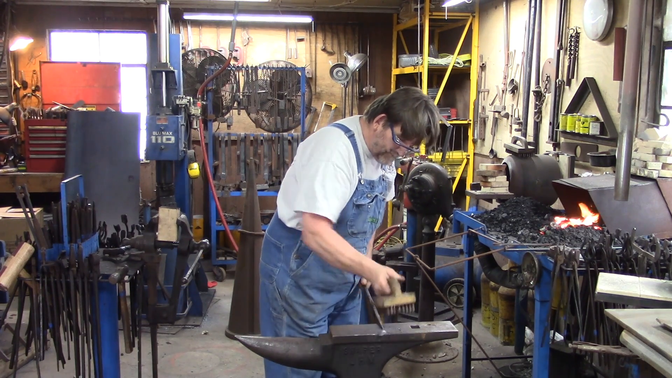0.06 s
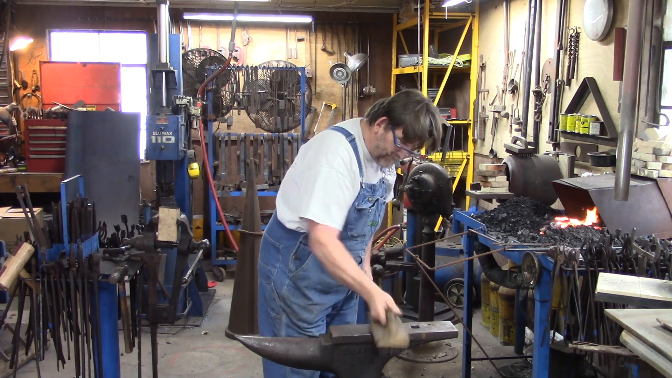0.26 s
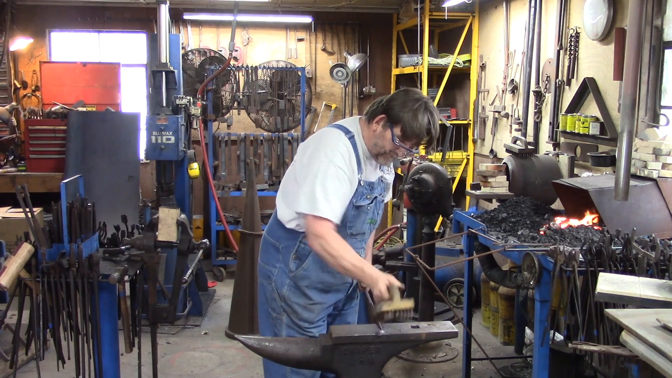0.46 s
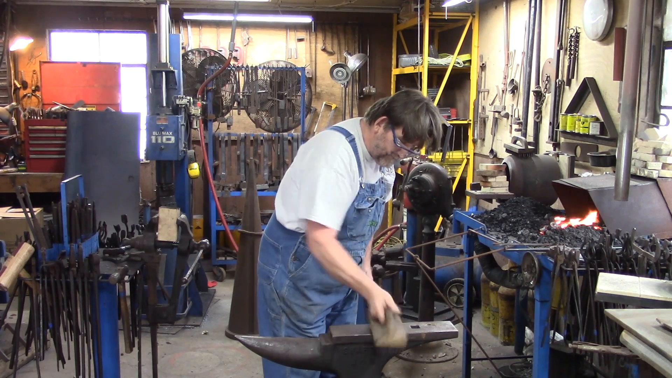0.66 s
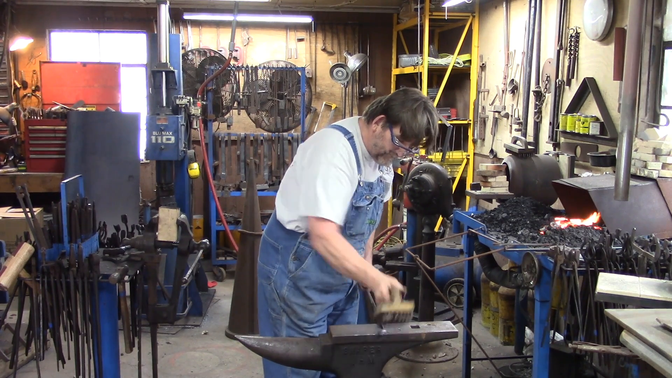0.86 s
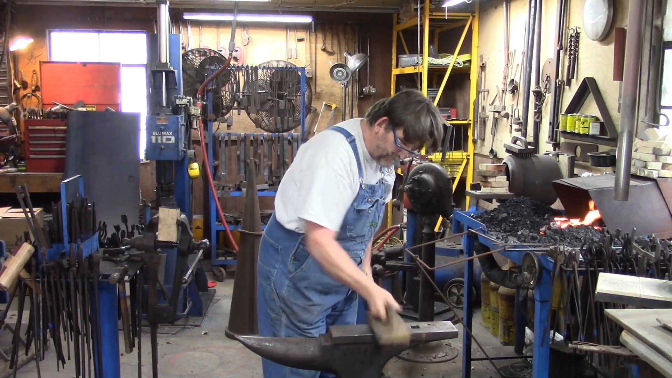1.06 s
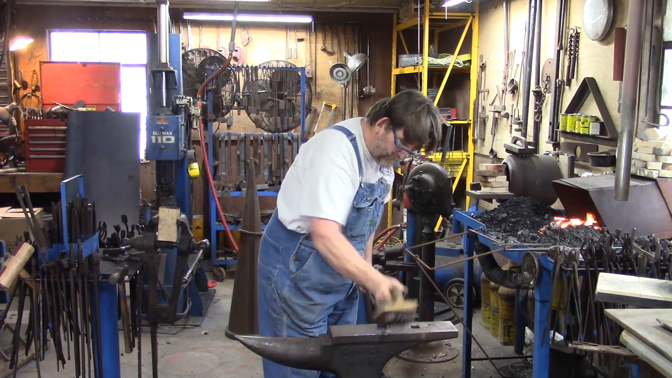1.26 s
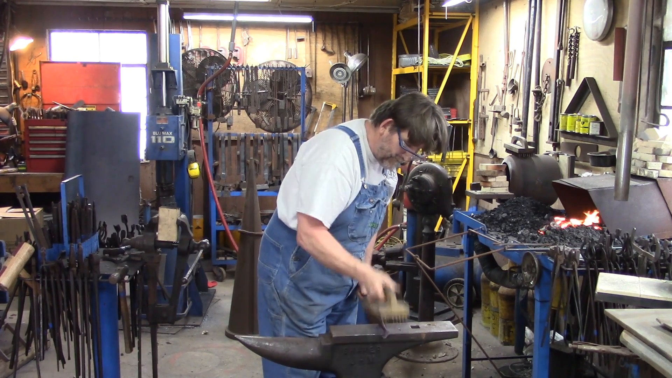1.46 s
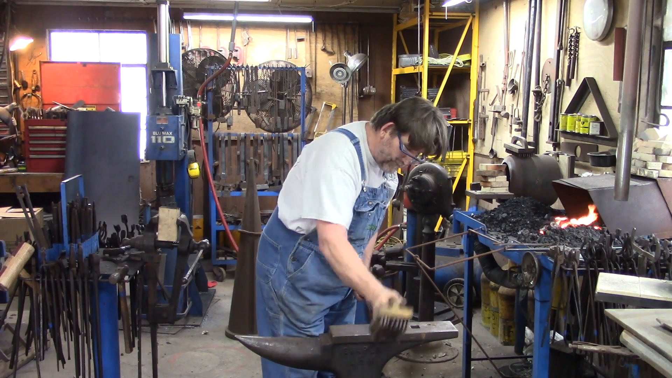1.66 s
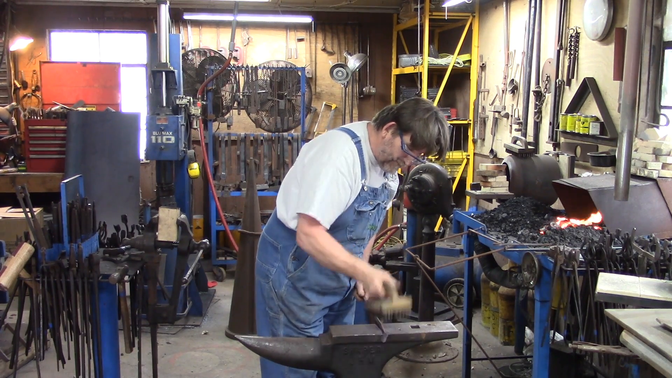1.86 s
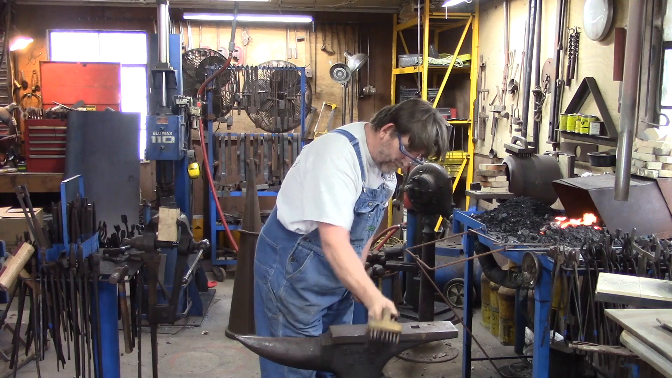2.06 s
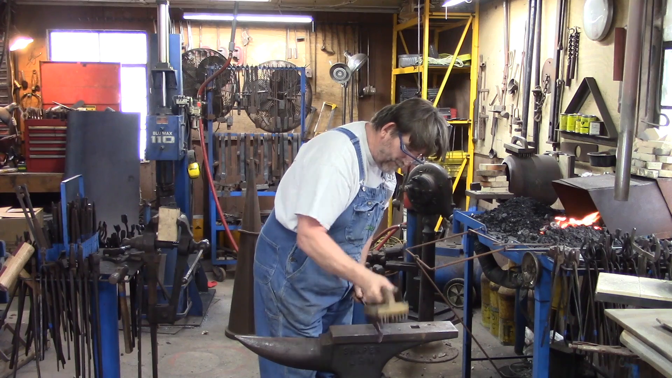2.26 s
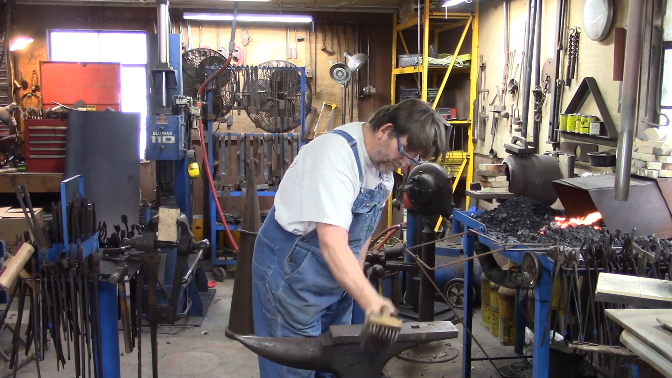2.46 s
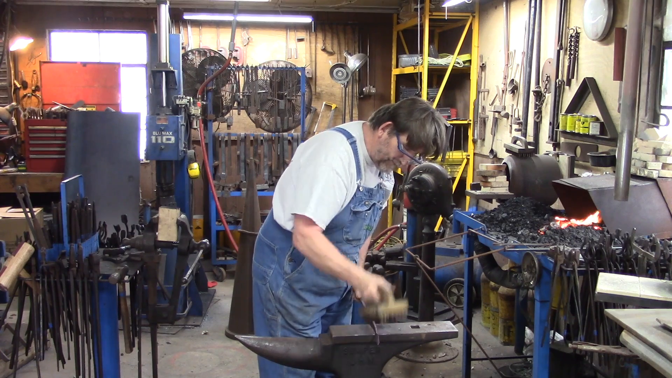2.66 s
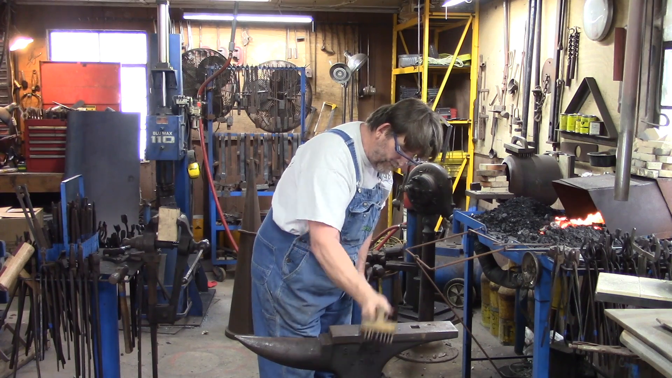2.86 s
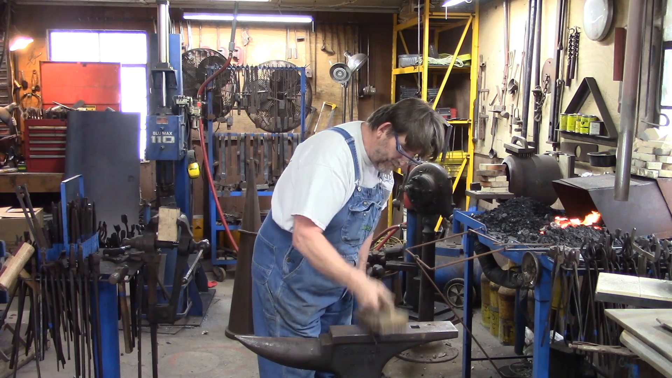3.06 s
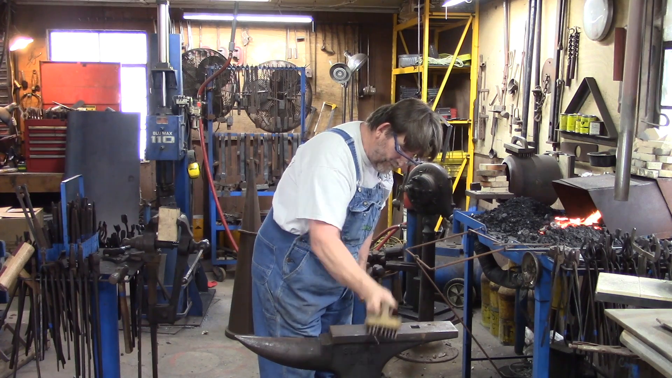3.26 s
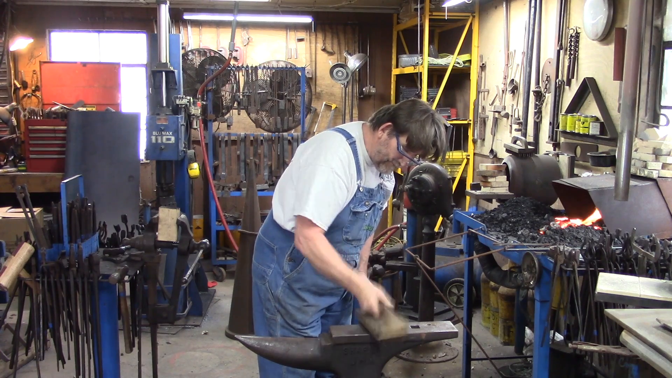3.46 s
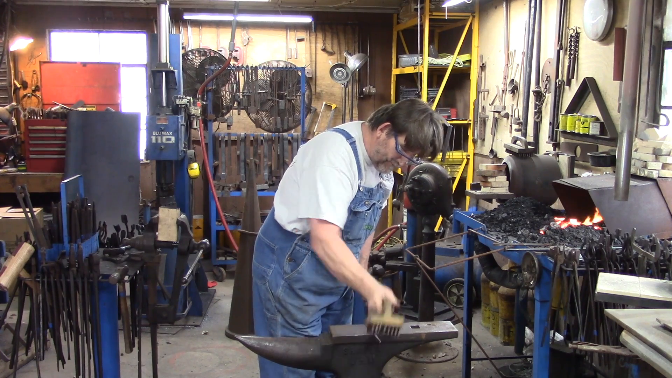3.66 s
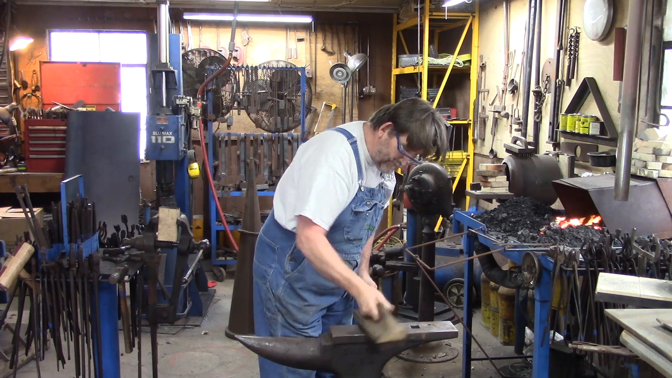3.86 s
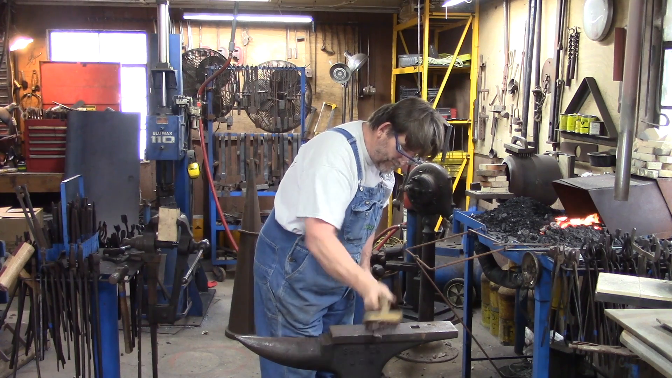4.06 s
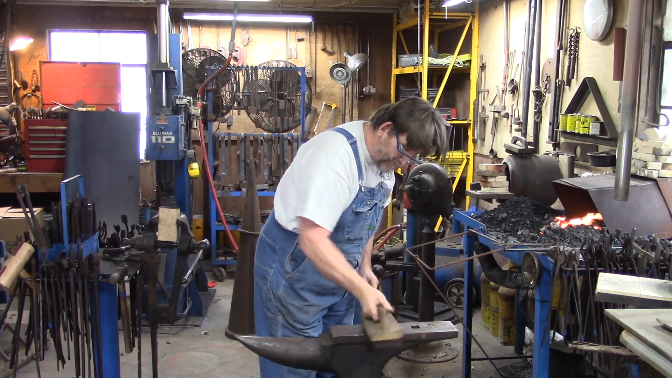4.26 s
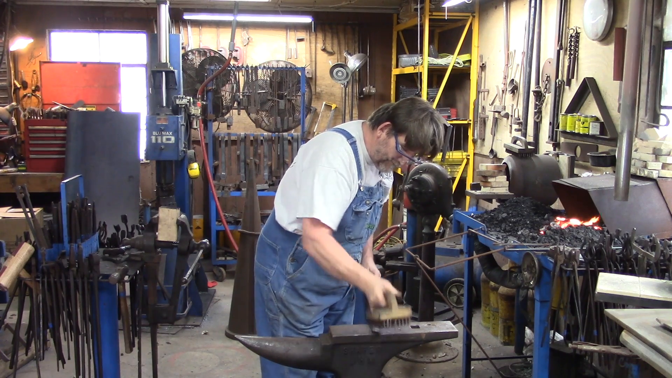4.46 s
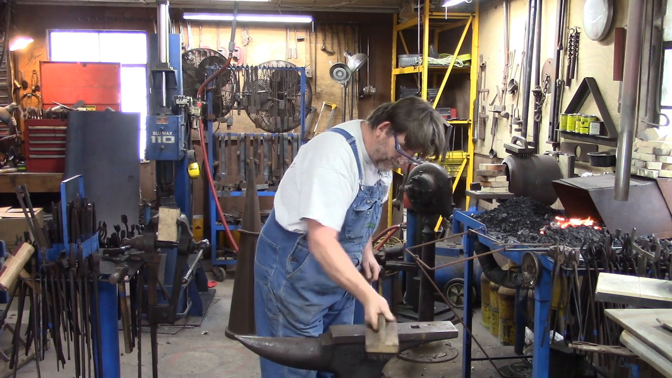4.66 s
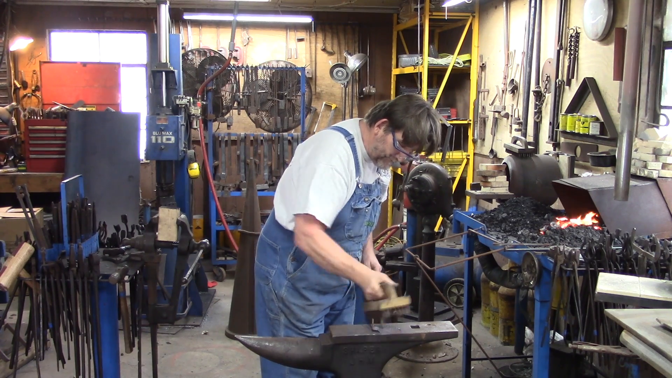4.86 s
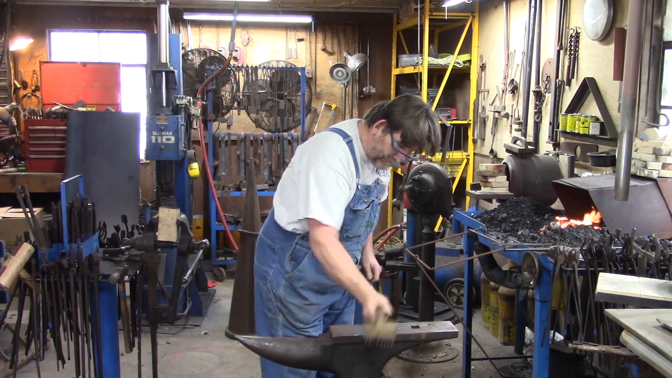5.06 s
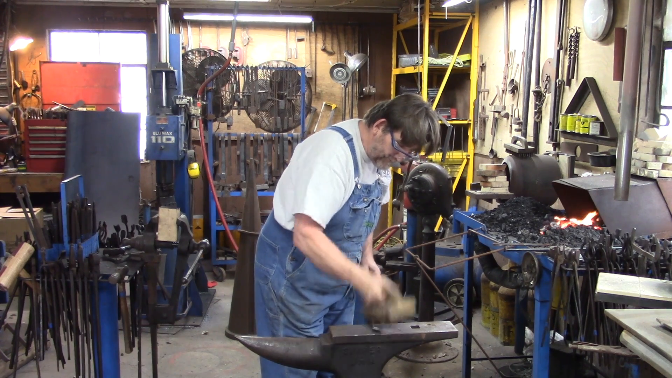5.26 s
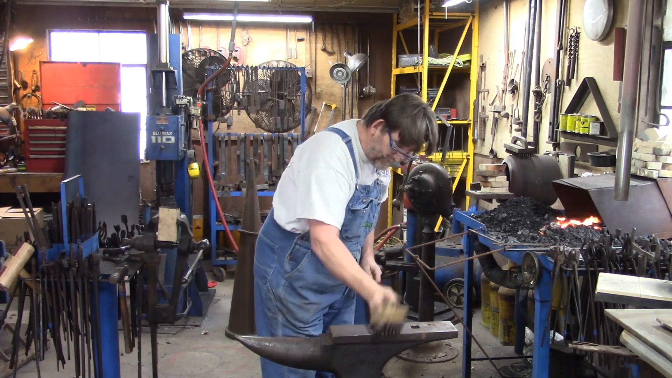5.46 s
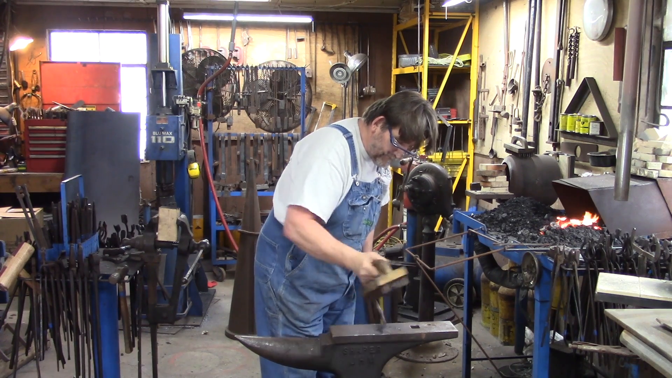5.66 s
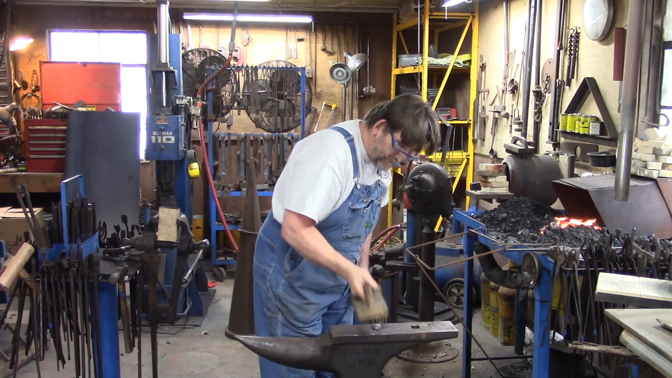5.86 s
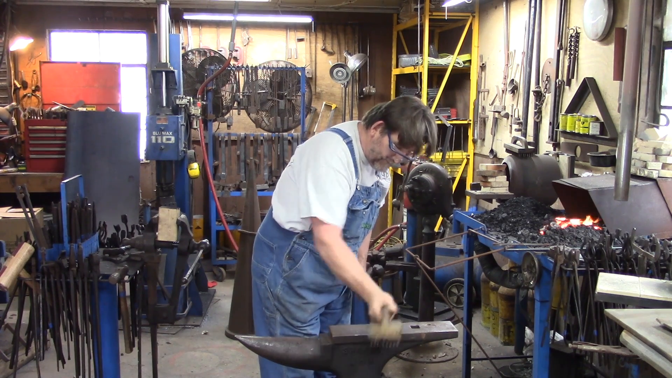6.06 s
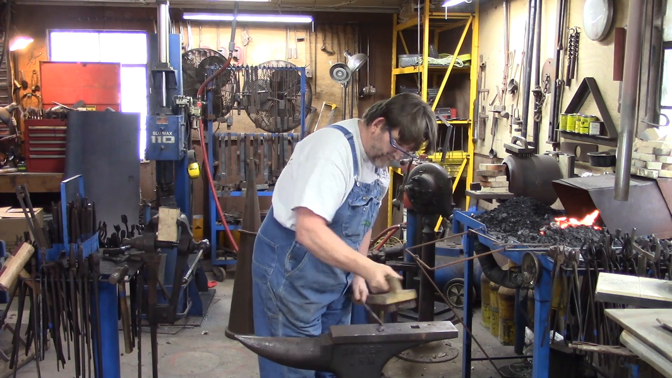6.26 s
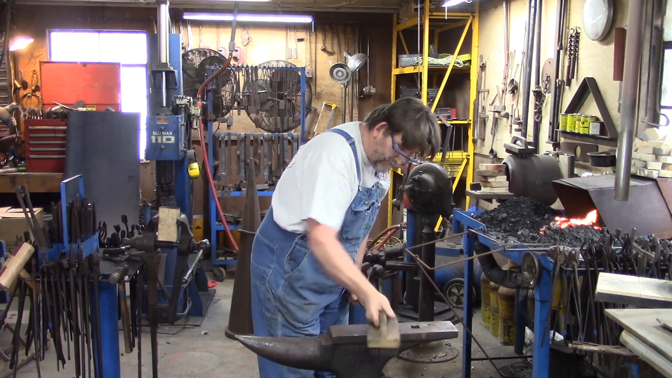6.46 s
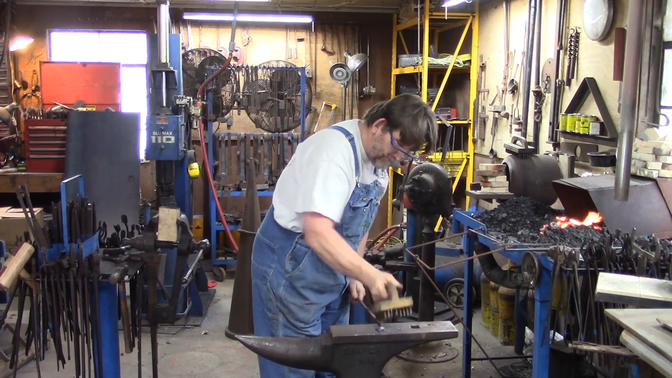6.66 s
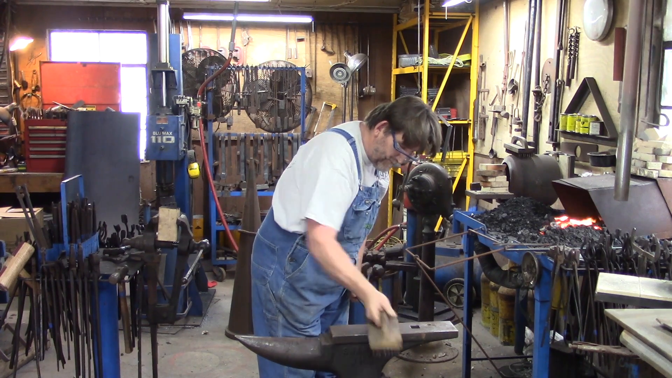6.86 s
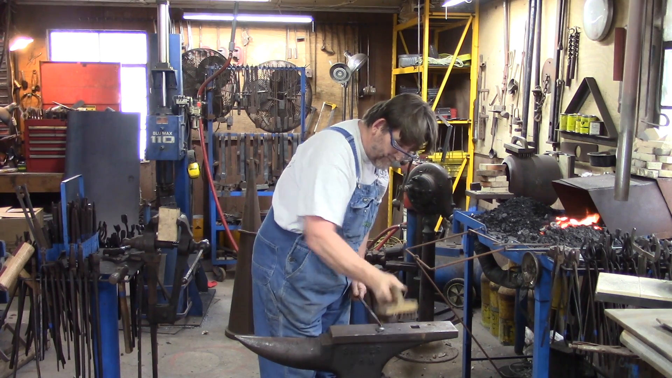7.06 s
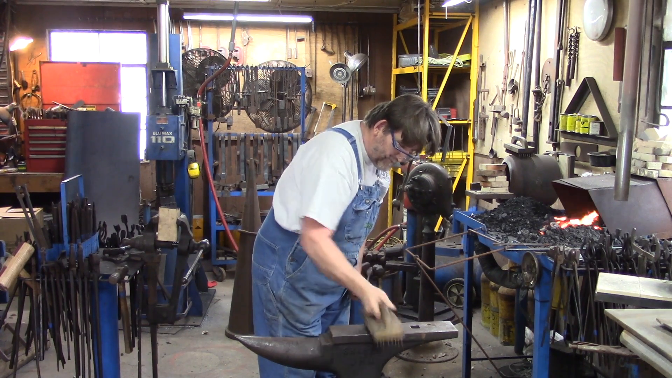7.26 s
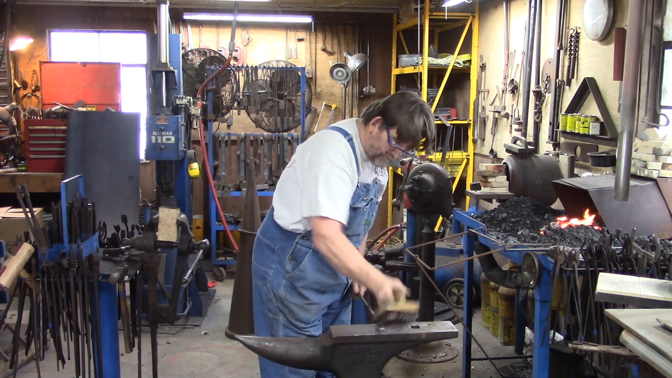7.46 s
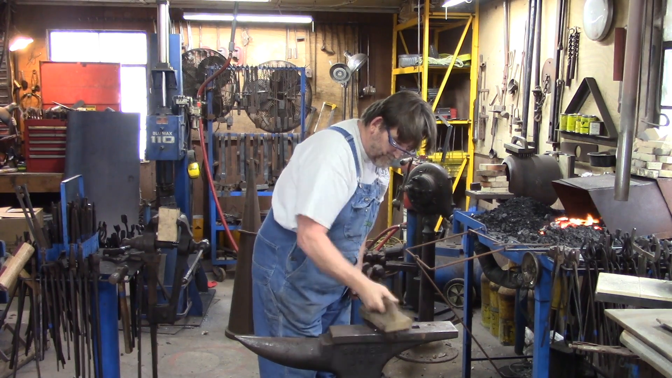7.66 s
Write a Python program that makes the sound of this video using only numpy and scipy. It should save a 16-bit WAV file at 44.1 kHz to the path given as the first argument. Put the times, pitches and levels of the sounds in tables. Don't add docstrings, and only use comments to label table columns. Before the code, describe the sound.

A quiet, distant forge blower hums with airy noise and a slight pipe whistle throughout. At 0 s the last of a brush stroke is dying away. From 0.2 s a wire brush scrubs a steel bar on an anvil, one short stroke about every 0.4 s. Each lands with a small knock, rasps for roughly a tenth of a second with gritty midrange and fizzing bristle hiss, then lifts off into a high steel ring and a half-second workshop tail. Strokes vary in bite and brightness. Around 3.84 s a loose tool clinks lightly. At 4.4 s the sound drops out completely for a blink. After the stroke at 5.3 s comes a longer gap, with a faint jingle of free bristles near 5.7 s. Scrubbing resumes at 5.97 s, with firm strokes around 6.4, 6.8, 7.25 and 7.7 s. The microphone is close and the image narrow.

```python
import sys
import numpy as np
from scipy import signal
from scipy.fft import rfft, irfft, next_fast_len
from scipy.io import wavfile

SR = 44100
rng = np.random.default_rng(int(sys.argv[2]) if len(sys.argv) > 2 else 0)


def wav_record(signal):
    frames = np.transpose(np.atleast_2d(signal))
    bounded = np.clip(frames, -1, 1)
    quanta = np.round(bounded * 32767).astype(np.int16)
    wavfile.write(sys.argv[1], SR, quanta)


def volts(x):
    e = np.asarray(x, float) / 20
    return 10 ** e


N = 340452
LEAD = SR // 4
SIZE = next_fast_len(N + LEAD + SR)

# [freq_hz, level_db]
SCRAPE_COLOUR = [(290, -33.5), (500, -12.5), (584, -11.5), (1120, -6), (1210, -10.5), (1840, -1),
                 (3000, -8), (3500, -8.5), (4550, -16), (7700, -120)]
# [freq_hz, level_db]
FIZZ_COLOUR = [(2470, -54), (4200, 2), (4840, 0), (5330, 0.5), (8930, -5), (11900, -12.5), (14300, -15),
               (15300, -17.5), (16300, -33)]
# [freq_hz, level_db]
WOOD_COLOUR = [(18, -77), (30, -41), (136, -25.5), (348, 2), (404, -0.5), (426, -12), (508, 3), (581, -8),
               (750, -9.5), (980, -56), (1650, -120)]
# [pitch_hz, width_hz, level_db]
BAR_MODES = [(993, 55, -9.5), (1093, 44, -7), (1260, 79, -2.5), (1441, 13, -4.5), (1564, 20, -5),
             (1690, 32, -4.5), (1794, 78, 3), (1890, 130, 3.5), (2262, 97, -7.5), (2430, 620, -2.5)]
# [pitch_hz, width_hz, level_db]
RING_MODES = [(3690, 110, -5), (3785, 90, 0), (3870, 110, -1.5), (4050, 110, -9), (4450, 160, -11)]


def brush():
    scrape, ring, fizz, wood, deep, main, upper, sheen = stroke_gains()
    coarse = slips(per_s=7000, spread_db=2.0, clump_db=-0.13, clump_rate=380)
    fine = slips(per_s=14000, spread_db=1.5, clump_db=1.5, clump_rate=210)

    body = volts(-4.0) * colour(scrape * coarse, SCRAPE_COLOUR)
    body += volts(-14.5) * wandering(scrape * fine * deep, BAR_MODES[:5], wander_db=3.5, rate=2.4)
    body += volts(-11.0) * wandering(scrape * fine * upper, BAR_MODES[8:], wander_db=-5.0, rate=33)

    steel = volts(-0.5) * wandering(ring * coarse, RING_MODES, wander_db=2.5, rate=150)
    steel += volts(-11) * wandering(scrape * fine * main, BAR_MODES[5:8], wander_db=3.5, rate=38)

    bristles = volts(-2.5) * colour(fizz * fine, FIZZ_COLOUR) + volts(-7.5) * pings(fizz)
    treble = signal.sosfilt(signal.butter(1, 8000, "high", fs=SR, output="sos"), bristles)
    tufts = patchy(body + bristles, patch_db=1.4, rate=35)
    back = volts(-3.5 + 1.7 * drift(20)) * colour(wood * fine, WOOD_COLOUR)
    return tufts + (sheen - 1) * treble + back, steel


# [touch_s, time_on_bar_s, scrape_db, bite_at_touch_db, slow_start_of_fizz_db]
STROKES = [(-.2, .12, -19.5, 0, 6), (.213, 0.12, -15.5, 16.5, 10), (0.625, 0.13, -16.5, 9, 2),
           (1.039, 0.12, -17, -1, 13), (1.518, 0.094, -19.5, 2, 14.5), (1.939, 0.097, -21.5, 10.5, 5.5),
           (2.336, 0.096, -20.5, 15, 1), (2.729, 0.079, -16, 11.5, 13), (3.103, 0.1, -18, 7, -1.5),
           (3.483, 0.13, -21.5, 9, -1.5), (3.867, .12, -17, 0, 12), (4.245, .14, -19, 3.5, 4),
           (4.605, 0.12, -16.5, 7.5, 4), (4.975, 0.098, -15.5, 13.5, 0), (5.326, .13, -18, 3, 8),
           (5.971, 0.088, -16, -3.5, 8), (6.417, 0.11, -14, 8, 5), (6.831, 0.13, -18, 16.5, 5),
           (7.249, .14, -16.5, 9.5, 0.5), (7.692, 0.103, -13.5, 4.5, 6)]
# [ring_peak_after_touch_s, ring_swell_db, fizz_re_scrape_db, wood_re_scrape_db]
VOICING = [(0.07, 0, -1.5, -24), (0.051, -6, -0.5, -20.5), (.09, 1, -0.5, -16), (0.08, 0, 1.5, -16),
           (0.086, 11, 3.5, -17.5), (0.024, 5, 0, -14), (0.051, 6.5, 0.5, -12), (0.037, 8, 2, -14.5),
           (0.09, 5, -1.5, -14), (0.1, 12, -2.5, -16), (0.064, 10, -3.5, -17.5), (0.078, 7.5, 0, -13),
           (0.11, 3, 0, -14.5), (0.062, 2, 1.5, -13.5), (0.052, 3, 1.5, -13), (0.098, 10, 1, -14.5),
           (0.059, 6.5, -3, -13.5), (0.044, -3, 0.5, -12), (0.013, 6, -0.5, -13.5), (.07, 6.5, 3.5, -16)]
# [last_bristles_flick_off_db, steady_ring_db, time_to_load_bristles_ms]
GRIP = [(-1, 2.5, 4), (4, -4, 3), (2, -1, 5.9), (5, -1.5, 2.3), (0, 0, 3), (3, -0.5, 2.5), (2.5, 2.5, 2.8),
        (-3.5, -3, 3), (0, 2.5, 4.6), (2, 1.5, 2.7), (1.5, 2, 14), (2, 1, 3.2), (3, 1.5, 4), (2, 3, 5),
        (3, 1.5, 2.2), (1, 2, 11), (2, 0.5, 3), (4, 1, 5), (5, 0, 4.6), (2, 0, 6)]
# [deep_notes_db, main_notes_db, upper_notes_db, top_sheen_db]
BEARING = [(-1, 0, 2, 3), (-1, -10, -11, -1), (-20, -1.5, 3, 2), (-10, -0.5, 3.5, -2), (-3, 2, 1, 2),
           (-15, 3, -6, 2), (-3, 4, 6, -0.5), (0, -2.5, -19, 1.5), (-5.5, 2, 3.5, 2.5), (-7, -1, 1, 3.5),
           (-6, -1, 0.5, 6), (-3, 2.5, 1.5, 1.5), (-8.5, -5, -1, -0.5), (-5, 4, 1.5, -1.5),
           (-15, 4.5, 3, -0.5), (-12, 0.5, 6.5, 2.5), (-9, -1, 0, 4), (-5, 0.5, 6.5, 2), (-21, 0, 3, 1.5),
           (9, -2, 10, 1)]


def stroke_gains():
    t = np.arange(-LEAD, N) / SR
    now = np.maximum(np.searchsorted(np.array(STROKES)[:, 0], t) - 1, 0)
    columns = np.column_stack([STROKES, VOICING, GRIP, BEARING])[now].T
    touch, length, level_db, bite_db, slow_db = columns[:5]
    sing_s, swell_db, fizz_db, wood_db = columns[5:9]
    flick_db, ring_db, load_ms = columns[9:12]
    bearing_db = columns[12:]

    age = t - touch
    off = np.maximum(age - length, 0)
    knee_s = 0.068
    lifted = np.minimum(off / knee_s, 1)
    flick = flick_db * np.exp(-((age - length) / 0.012) ** 2)
    swell = swell_db * np.exp(-((age - sing_s) / 0.016) ** 2)

    load = level_db - 8.5 * np.maximum(1 - 1000 * age / load_ms, 0)
    load += flick + 0.067 * swell
    load -= 260 * off + 146 * np.maximum(off - knee_s, 0)
    bite = bite_db * np.exp(-age / 0.013)
    ring = -4.5 + ring_db + swell + 10 * lifted
    fizz = fizz_db + 0.23 * flick - slow_db * np.exp(-age / 0.033)
    wood = wood_db + 0.69 * bite + 8.5 * lifted
    gains = volts(load + np.array([bite, ring, fizz, wood])) * (age >= 0)
    return *gains, *volts(bearing_db)


def pings(gain):
    snaps = gain * slips(per_s=410, spread_db=-4.0, clump_db=5.5, clump_rate=15)
    dealt = rng.integers(0, 10, N + LEAD)
    out = 0
    for k, hz in enumerate(np.geomspace(4300, 12500, num=10)):
        level_db = -7.0 * np.log2(hz / 4300)
        out = out + volts(level_db) * resonate(snaps * (dealt == k), [(hz, hz * 0.057, level_db)])
    return out


# [start_s, knock_peak_db, knock_pitch_hz, ping_re_knock_db, ping_pitch_hz]
LANDINGS = [(0.217, -5.5, 1370, 7, 9000), (0.631, -11, 1597, 15.5, 7400), (1.044, -4.5, 1360, -2, 9000),
            (1.523, -10.5, 1520, -6, 8100), (1.941, -8, 1350, -18, 8300), (2.34, -7, 1250, -19, 6560),
            (2.736, -21, 1574, -9, 6850), (3.101, -19, 1230, -7.5, 7110), (3.483, -12.5, 1300, -1, 7110),
            (3.87, -13, 1250, -6, 7700), (3.908, -14, 1470, 3.5, 6890), (4.25, -12, 1040, -15, 6700),
            (4.611, -10.5, 1180, -5, 6610), (4.974, -5, 1400, -26, 6600), (5.327, -6.5, 1250, -14, 7970),
            (5.978, -12.5, 1310, 3, 8110), (6.42, -7, 1210, -20, 6730), (6.832, -5, 1450, -6.5, 8100),
            (7.252, 0, 1440, -9.5, 6690), (7.699, -4, 1260, -2, 7050)]


def landings():
    length = 4000
    out, t = np.zeros(N + LEAD + length), np.arange(length) / SR
    noises = rng.standard_normal((len(LANDINGS), length))
    for (s, knock_db, knock_hz, ping_db, ping_hz), noise in zip(LANDINGS, noises):
        knock_modes = [(knock_hz, 180, 0), (knock_hz * 0.844, 150, -3)]
        ping_modes = [(ping_hz, 400, 0), (ping_hz * 1.14, 400, -1.5),
                      (ping_hz * 1.3, 500, -3), (ping_hz * .8, 400, -4)]
        knock = volts(-9) * resonate(noise * np.exp(-t / 0.031), knock_modes)
        ping = volts(ping_db - 9) * resonate(noise * np.exp(-t / 0.011), ping_modes)
        thump_db = -21 + 0.29 * ping_db - 5
        thump = volts(thump_db) * resonate(noise * np.exp(-t / 0.019), [(110, 370, 0)])
        at = LEAD + round(s * SR)
        out[at:at + length] += volts(knock_db) * (knock + ping + thump)
    return out[:N + LEAD]


# [time_s, level_db]
JINGLE = [
    (5.69, -42),
    (5.696, -27.5),
    (5.718, -36),
    (5.728, -33),
    (5.747, -22),
    (5.765, -35),
    (5.87, -45),
    (5.88, -50),
]
# [pitch_hz, width_hz, level_db]
JINGLE_MODES = [(2730, 130, -2), (3580, 200, -4), (4430, 260, -7), (5370, 99, -1), (6410, 200, -1),
                (7220, 40, -4), (7470, 140, -2), (7950, 140, -1), (8640, 60, -4), (9570, 60, -12),
                (10700, 300, -19), (12250, 90, -15), (13600, 90, -22), (14800, 50, -17)]
# [time_s, level_db]
CLINK = [
    (3.834, -50),
    (3.84, -36),
    (3.856, -38),
]
# [pitch_hz, width_hz, level_db]
CLINK_MODES = [(2600, 70, 0), (5460, 110, -4.5), (4500, 120, -9)]


def jingle():
    shake, = pressure([JINGLE], release_db_s=318)
    clink, = pressure([CLINK], release_db_s=500)
    taps = slips(per_s=5000, spread_db=3.0, clump_db=.6, clump_rate=40)
    modes = [(hz, width, top_db + 10 * np.log10(width / 100)) for hz, width, top_db in JINGLE_MODES]
    start, end = LEAD + int(5.6 * SR), LEAD + 6 * SR
    out = volts(-6) * colour(shake * taps, FIZZ_COLOUR)
    out[start:end] += wandering((shake * taps)[start:end], modes, wander_db=1.5, rate=25)
    return volts(-12.5) * out + resonate(clink * taps, CLINK_MODES)


def smithy(near, sent, tail_db):
    place = 2 * np.pi * 1.7 * np.arange(len(sent)) / SR

    def tail(x):
        return volts(tail_db) * signal.fftconvolve(x, dying_noise())[:len(sent)]

    here = tail(sent * np.cos(place))
    there = tail(sent * np.sin(place))
    side = tail(sent)
    bounce = np.pad(near, (round(.004 * SR), 0))[:len(near)]
    return stereo(near + here + there, side + volts(-7.0) * bounce)


# [freq_hz, time_to_fall_60_db_s]
SMITHY_DECAY = [(150, 0.32), (400, 0.66), (1000, 0.45), (2800, 0.72), (6000, 0.47), (10000, 0.27),
                (15000, 0.22)]


def dying_noise():
    t, edges, out = np.arange(SR) / SR, 40 * 2 ** np.arange(0, 9, 1 / 3), 0
    white = rng.standard_normal((2, SR))
    for k, (low, high) in enumerate(zip(edges, edges[1:])):
        decay = volts(-60 * t / at_hz(SMITHY_DECAY, np.sqrt(low * high)))
        decay = decay * np.minimum(t / 0.022, 1)
        band = signal.sosfilt(signal.butter(2, [low, high], "band", fs=SR, output="sos"), white[k % 2])
        out = out + band * decay / np.linalg.norm(decay)
    return out


# [freq_hz, side_re_mid_db]
SIDE_LEVEL = [(30, -9), (80, -16), (250, -18.5), (1000, -31), (2000, -25), (4000, -15), (8000, -14.5),
              (12500, -12.5), (14000, -33)]


def stereo(mid, side):
    gain = volts(at_hz(SIDE_LEVEL, np.fft.rfftfreq(SIZE, 1 / SR)))
    side = irfft(rfft(side, SIZE) * gain, SIZE)[:len(mid)]
    return np.array([mid + side, mid - side])


# [freq_hz, level_db]
BLOWER_COLOUR = [(18, -31), (30, -18), (95, -24.5), (179, -10), (394, -9.5), (554, -4.5), (702, -4.5),
                 (1350, -12), (1590, -11), (2830, -17), (3310, -18), (7670, -25), (16000, -32)]
# [pitch_hz, width_hz, level_re_air_db]
BLOWER_MODES = [(1379, 53, -3.5), (2750, 110, -12.5)]


def blower(level_db):
    air = []
    for noise in rng.standard_normal((2, N + LEAD)):
        whistle = sum(volts(m[2]) * resonate(noise[::-1], [m]) for m in BLOWER_MODES)
        air.append(colour(noise, BLOWER_COLOUR) + whistle)
    return volts(level_db) * stereo(air[0], volts(7.5) * air[1])


def slips(per_s, spread_db, clump_db, clump_rate):
    sizes = volts(spread_db * np.minimum(rng.exponential(1, N + LEAD), 5)) * rng.choice([-1, 1], N + LEAD)
    happens = rng.random(N + LEAD) < per_s / SR
    return rms_one(sizes * happens * volts(clump_db * drift(clump_rate)))


def pressure(tables, release_db_s):
    t = np.arange(-LEAD, N) / SR
    level = np.full((len(tables[0][0]) - 1, N + LEAD), -200.)
    for rows in tables:
        s, *columns = np.transpose(rows)
        on = t >= s[0]
        level[:, on] = [np.interp(t[on], s, c) for c in columns]
        level[0, on] -= release_db_s * np.maximum(t[on] - s[-1], 0)
    level[1:] += level[0]
    return volts(level)


def patchy(x, patch_db, rate):
    out, rest = 0, x
    for hz in 800 * 2 ** np.arange(0, 4.1, .6):
        low = signal.sosfilt(signal.butter(2, hz, fs=SR, output="sos"), rest)
        out = out + low * volts(patch_db * drift(rate))
        rest = rest - low
    return out + rest


def wandering(x, modes, wander_db, rate):
    out = 0
    for k, mode in enumerate(modes):
        gain = volts(mode[2] + wander_db * drift(rate)[:len(x)])
        out = out + (-1) ** k * gain * resonate(x, [mode])
    return out


def resonate(x, modes):
    out, power = 0, 0
    for k, (hz, width, level_db) in enumerate(modes):
        r = np.exp(-np.pi * width / SR)
        b = (1 - r * r) / 2 * np.array([1, 0, -1])
        a = [1, -2 * r * np.cos(2 * np.pi * hz / SR), r * r]
        out = out + (-1) ** k * volts(level_db) * signal.lfilter(b, a, x + 1e-18)
        power += volts(level_db) ** 2 * np.pi * width / SR
    return out / np.sqrt(power)


def colour(x, spectrum):
    cepstrum = irfft(np.log(volts(at_hz(spectrum, np.fft.rfftfreq(4096, 1 / SR)))))
    cepstrum[1:2048] *= 2
    cepstrum[2049:] = 0
    taps = irfft(np.exp(rfft(cepstrum)))
    return signal.oaconvolve(x, taps / np.linalg.norm(taps))[:len(x)]


def drift(rate):
    r = np.exp(-32 * np.pi * rate / SR)
    slow = signal.lfilter([1], [1, -2 * r, r * r], rng.standard_normal((N + LEAD) // 16 + 2))
    return np.interp(np.arange(N + LEAD) / 16, np.arange(len(slow)), rms_one(slow))


def at_hz(points, hz):
    table_hz, values = np.array(points).T
    return np.interp(np.log(hz + 1), np.log(table_hz), values)


def rms_one(x):
    return x / np.sqrt(np.mean(x ** 2) + 1e-20)


def scene():
    scrape, steel = brush()
    rest = scrape + landings() + jingle()
    sent = rest + volts(-8) * steel
    room = smithy(rest + steel, sent, tail_db=-4.0)
    return (room + blower(level_db=-42))[:, LEAD:]


def band_limit(x):
    return signal.sosfilt(signal.butter(12, 16450, fs=SR, output="sos"), x)


def record(dry):
    t = np.arange(N) / SR
    live = (t < 4.3985) | (t > 4.4292)
    bass_cut = signal.butter(2, 55, "high", fs=SR, output="sos")
    top_cut = signal.ellip(12, .3, 45, 15750, fs=SR, output="sos")
    rounded = 1.019 * np.tanh(dry / 1.203)
    x = signal.sosfilt(bass_cut, rounded) * live
    mix = signal.sosfilt(top_cut, x)
    return band_limit(mix)


dry = scene()
out = record(dry)
wav_record(out)
```